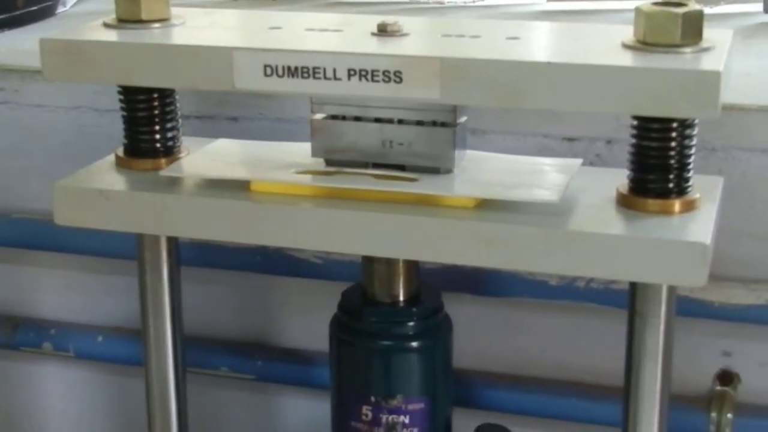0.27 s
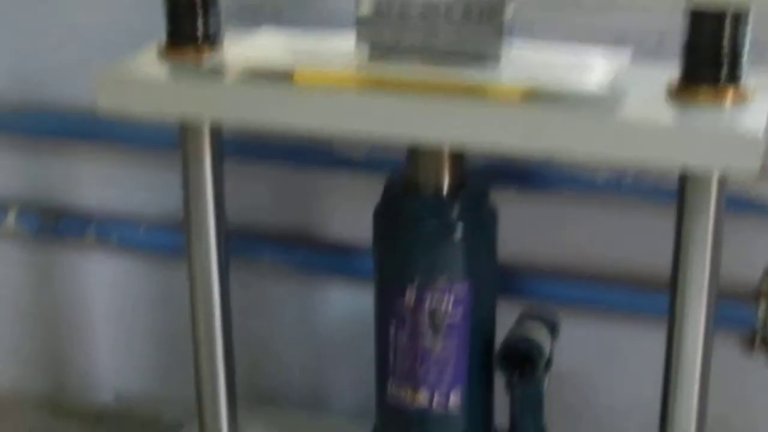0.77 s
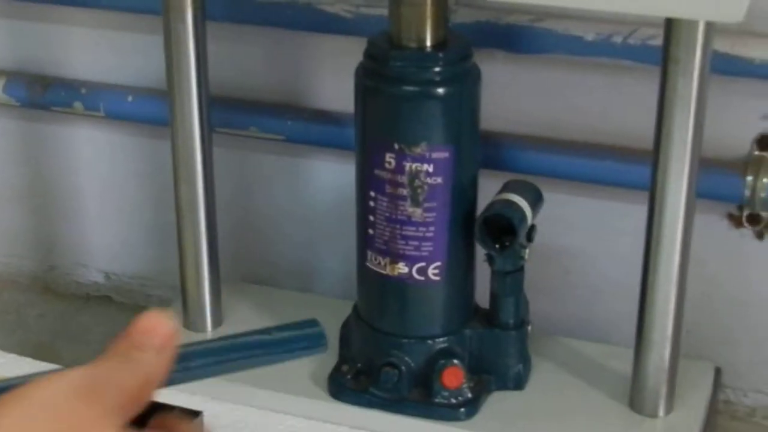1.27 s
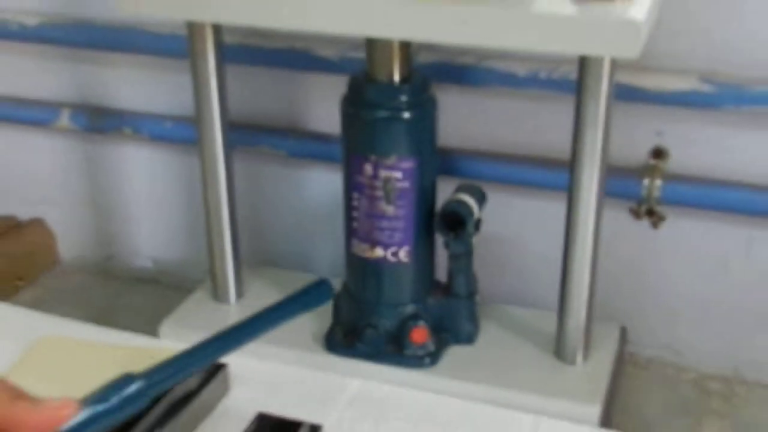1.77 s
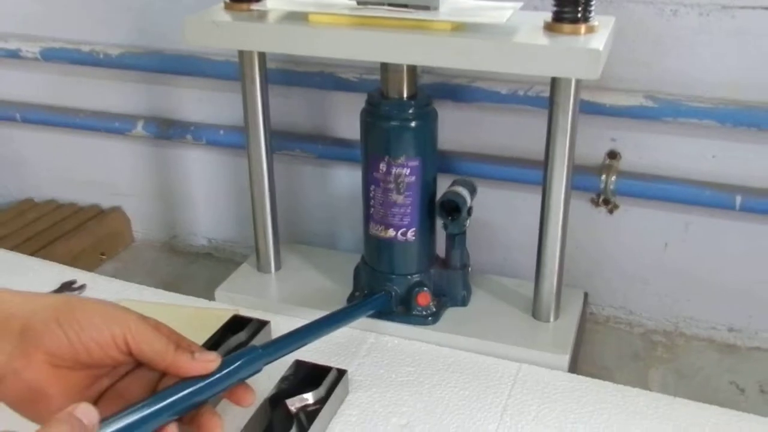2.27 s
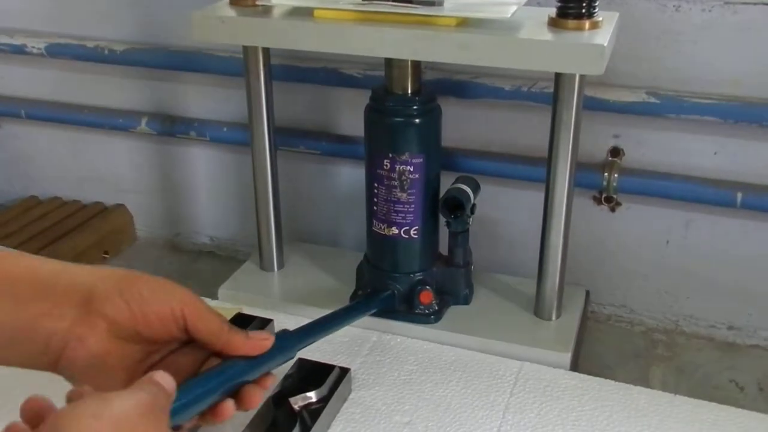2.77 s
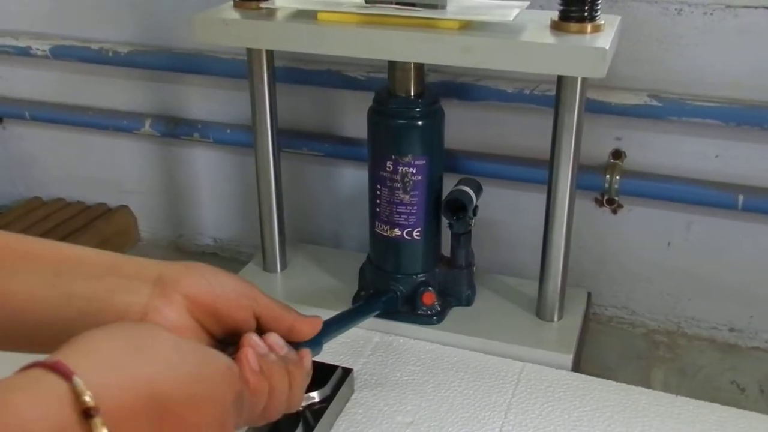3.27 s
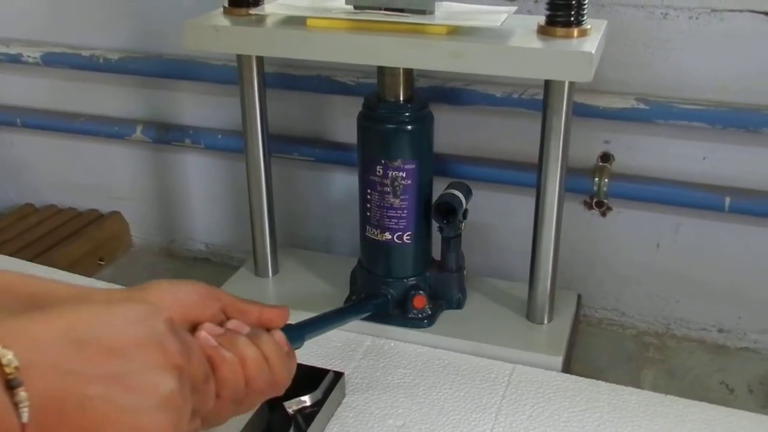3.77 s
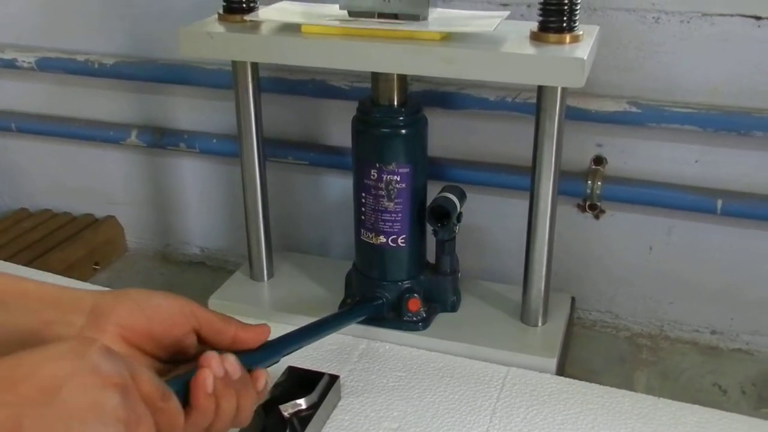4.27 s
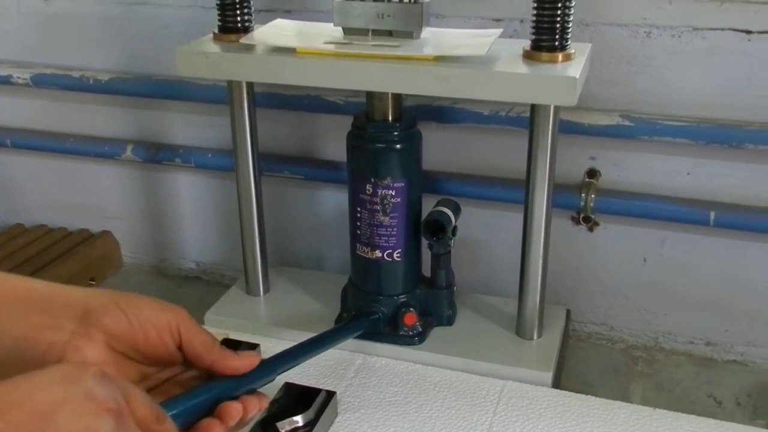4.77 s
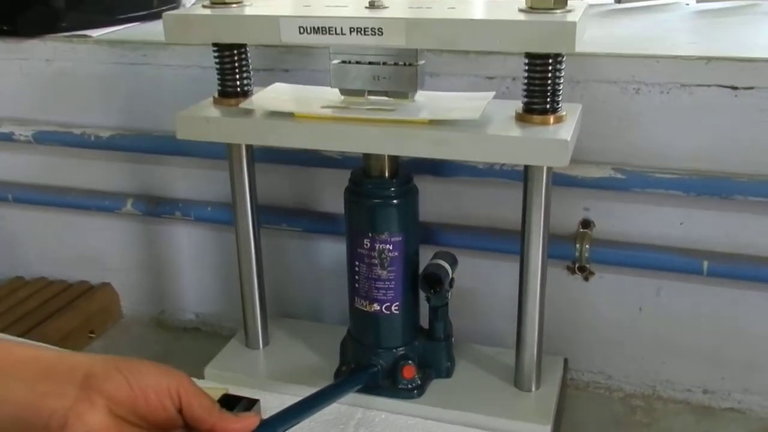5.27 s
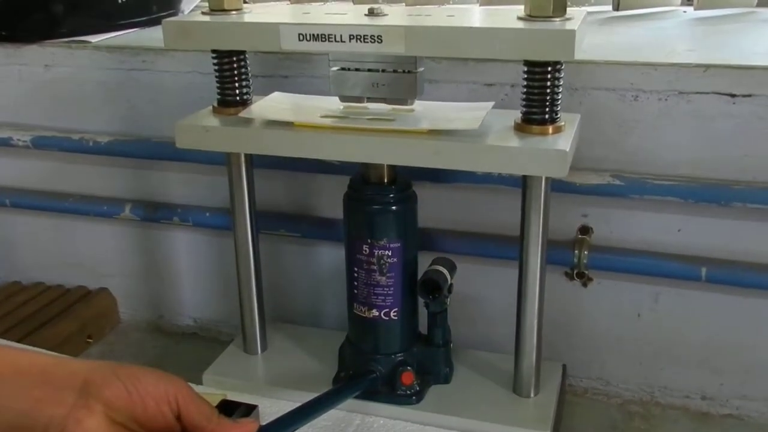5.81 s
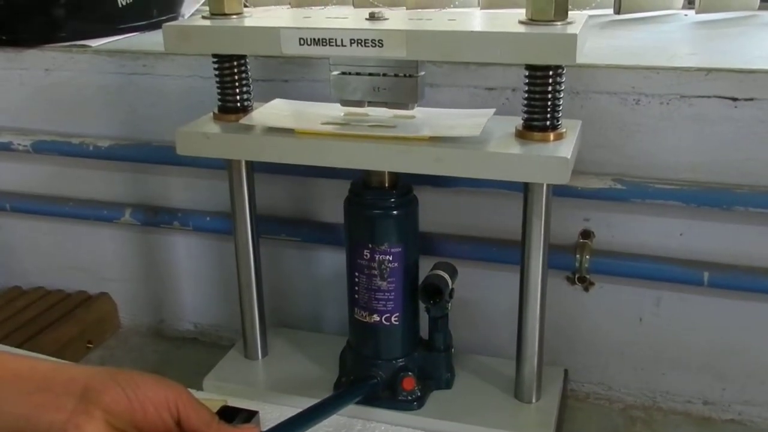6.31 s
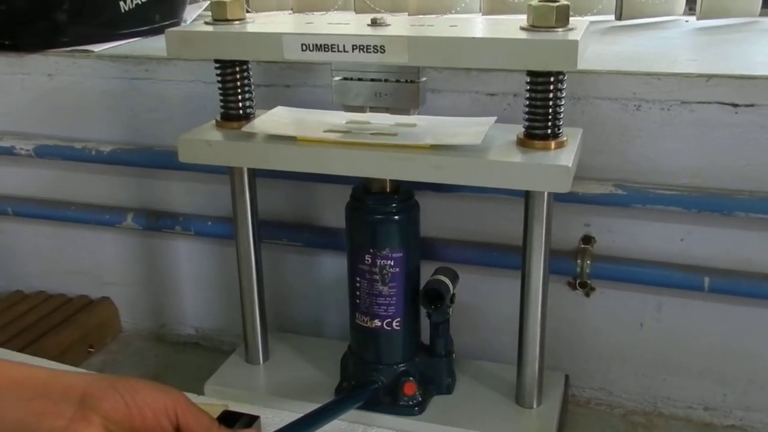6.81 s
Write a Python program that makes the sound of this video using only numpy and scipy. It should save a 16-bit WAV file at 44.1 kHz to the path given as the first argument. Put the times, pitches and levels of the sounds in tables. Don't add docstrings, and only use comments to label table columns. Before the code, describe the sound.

A fan's steady low drone and airy hiss, then ragged wind rumble and slaps buffet the microphone, with small steel ticks, easing near the end.

```python
import sys
import numpy as np
from scipy import signal
from scipy.fft import rfft, irfft, next_fast_len
from scipy.io import wavfile
from scipy.ndimage import uniform_filter1d

SR = 44100
rng = np.random.default_rng(int(sys.argv[2]) if len(sys.argv) > 2 else 0)


def materialize(psi):
    bounded = np.clip(np.atleast_2d(psi).T, -1, 1)
    quanta = np.round(bounded * 32767).astype(np.int16)
    wavfile.write(sys.argv[1], SR, quanta)


def ratio(d):
    e = np.asarray(d, float) / 20
    return 10 ** e


N = 310890
TIME = np.arange(N) / SR

# (frequency [Hz], level [dB per Hz])
TEARING_TONE = [(120, -12), (280, 5), (450, 5), (650, -1.5), (940, -10), (1350, -25), (2300, -37),
                (4000, -50)]


def evened(x):
    return x / np.sqrt(np.mean(x ** 2) + 1e-20)


def read(points, hz):
    f, value = np.transpose(points)
    return np.interp(np.log(hz + 1), np.log(f + 1), value)


def coloured(x, points):
    size = next_fast_len(x.shape[-1])
    curve_db = read(points, np.fft.rfftfreq(size, 1 / SR))
    return irfft(rfft(x, size) * ratio(curve_db), size)[..., :x.shape[-1]]


def drift(rate_hz, channels=1):
    b, a = signal.butter(1, np.clip(rate_hz, .1, 900), fs=SR)
    noise = rng.standard_normal((channels, N + SR))
    smooth = signal.lfilter(b, a, signal.lfilter(b, a, noise))
    return evened(smooth[:, SR:])


def fuzzy(hz, width_hz):
    a, b = drift(width_hz, channels=2)
    return a * np.cos(2 * np.pi * hz * TIME) + b * np.sin(2 * np.pi * hz * TIME)


def add(mix, start_s, sound):
    part = mix[:, round(start_s * SR):][:, :sound.shape[1]]
    part += sound[:, :part.shape[1]]


def gain_db():
    # (time [s], gain just after [dB])
    pulls = [(1.502, 1), (1.576, -1.5), (1.664, -9.5), (1.911, -11.5), (1.985, -18.5), (2.457, -15.5),
             (2.821, -12), (2.931, -14.5), (3.51, -12.5), (3.619, -14), (3.766, -16.5), (4.066, -17),
             (4.402, -17), (4.722, -18.5), (5.246, -15.5), (5.413, -19), (5.824, -17), (6.126, -17),
             (6.435, -16.5)]
    s, db = np.transpose([(0, 0)] + list(pulls))
    last = np.searchsorted(s, TIME, "right") - 1
    since = TIME - s[last]
    climb_db = 12 * since + 7 * since ** 2
    return uniform_filter1d(np.minimum(db[last] + climb_db, 0), 130)


def fan_air():
    # (frequency [Hz],
    # level [dB per Hz])
    air_tone = [(25, -24), (60, -24), (100, -9), (190, -12), (440, -9.5), (490, -13.5), (1010, -10),
                (1350, -19.5), (1850, -21.5), (2600, -28.5),
                (3300, -27), (5000, -33), (6500, -30), (7000, -32.5), (7600, -39), (11200, -40),
                   (12000, -45), (15800, -45)]
    # (frequency [Hz], likeness [-1 to 1])
    likeness = [(60, 0.97), (130, 0.96), (290, 0.95), (640, 0.98), (1410, 0.9), (3100, 0.6), (6820, 0.48),
                (15000, -0.23)]
    # (frequency [Hz], left over right [dB])
    balance = [(60, 8), (180, 2.5), (550, 2.5), (1650, -0.61), (4970, -2), (15000, 1)]
    frames, hz = N // 512 + 5, np.fft.rfftfreq(2048, 1 / SR)
    a, b, c, d, patches = rng.standard_normal((frames, 1025, 5)).T
    patches = evened(uniform_filter1d(uniform_filter1d(patches, 14, 0), 8, 1))
    same = np.clip(read(likeness, hz), -1, 1)[:, None]
    side = ratio(read(balance, hz)[:, None] / 2)
    left = a + 1j * b
    right = same * left + np.sqrt(1 - same ** 2) * (c + 1j * d)
    spectrum = np.array([left * side, right / side])
    spectrum *= ratio(read(air_tone, hz)[:, None] + 1.1 * patches)
    noise = signal.istft(spectrum, nperseg=2048, noverlap=1536)[1][:, :N]
    return ratio(-24.5 + .5 * drift(1.1)) * evened(noise)


def fan_tones():
    # (multiple of shaft speed, level [dB])
    hums = [(3, -35), (4, -43), (6, -30), (7, -41), (9, -43), (10, -38), (12, -36), (15, -45), (16, -44),
            (21, -46), (24, -42), (30, -46)]
    # (frequency [Hz], width [Hz], level
    # [dB])
    housing = [(101.2, 5.7, -37), (1016, 24, -37), (1850, 36, -45.5), (2090, 30, -53)]
    # (start [s], end [s], frequency [Hz], width [Hz], level [dB])
    whines = [
        (1.05, 3.6, 2795, 20, -47),
        (2.2, 6.0, 3245, 6, -57),
    ]
    shaft_hz = 37.43 * (1 + 0.00143 * drift(0.61)[0])
    turn = 2 * np.pi * np.cumsum(shaft_hz) / SR
    out = np.zeros(N)
    for k, db in hums:
        out += np.sqrt(2) * ratio(db + 2.4 * drift(5.6)[0]) * np.sin(k * turn + 6 * rng.random())
    for hz, width, db in housing:
        out += ratio(db) * fuzzy(hz, width)
    for start, end, hz, width, db in whines:
        fade = np.clip(np.minimum(TIME - start, end - TIME) / 0.26, 0, 1)
        out += ratio(db) * (.3 * fuzzy(hz, width) + np.sin(2 * np.pi * hz * TIME)) * fade
    return out * ratio(np.array([[.7], [-.7]]))


def handle():
    # (time [s], level [dB], frequency [Hz], time to fade by 60 dB [s])
    ticks = [
        (.105, -41, 11700, .05),
        (1.471, -20.5, 4470, 0.0087),
        (3.0152, -23, 6000, .004),
        (4.2063, -31, 6040, 0.0036),
        (5.4016, -33, 5000, .004),
    ]
    out, u = np.zeros((2, N)), np.arange(2600) / SR
    for s, db, hz, fade_s in ticks:
        noise = rng.standard_normal(2600)
        scrape = evened(coloured(noise, [(.5 * hz, -30), (0.86 * hz, 0), (1.2 * hz, 0), (2.5 * hz, -20)]))
        ring = np.sin(2 * np.pi * hz * u) + 0.73 * scrape * ratio(-60 * u / 0.013)
        add(out, s, ratio(db - 60 * u / fade_s) * ring * np.ones((2, 1)))
    return out


def cracks():
    # (time [s], level after the gain control [dB], left over right [dB])
    bursts = [(2.1939, -45, -1.0), (2.7317, -29, -5.0), (2.8094, -41, -1.0), (3.0131, -20.5, -11),
              (3.3334, -28, -4.0), (3.6094, -34, 1), (3.8706, -30, 9.0), (3.8966, -28, 2),
              (4.0532, -38, -3.0), (4.078, -26, -1.0), (4.2535, -29, 3.0), (4.3287, -29, 0.0),
              (4.7112, -27, 3.0), (4.9614, -37, 1), (5.0449, -27, 4.0), (5.814, -31, -6), (6.117, -31, -1),
              (6.4273, -20.5, 13)]
    out, u, gain = np.zeros((2, N)), np.arange(-220, 220) / SR, gain_db()
    tick = np.exp(-(u / 0.00061) ** 2) * np.sin(2 * np.pi * 1060 * u)
    for s, db, pan_db in bursts:
        ports_db = db + 3.5 + np.array([[pan_db], [-pan_db]]) / 2
        add(out, s - .003, tick * ratio(ports_db - gain[round(s * SR)]))
    return out


def eddies(pops, points, steady_s):
    x = coloured(pops, points)
    span = max(round(steady_s * SR), 8)
    power = uniform_filter1d(uniform_filter1d(x ** 2, span), span)
    return evened(x / np.sqrt(abs(power) + 1e-12))


def slaps():
    # (time [s], near port [dB], far port [dB], slow push [dB]), after the gain control
    left_bursts = [(1.562, -10, -40, 16), (1.617, -11, -10, 9), (1.821, -6, -22, -9), (2.197, -12, -8, 2),
                   (2.287, -12, -9, -5), (2.424, 4.5, -5, 7), (2.447, -6, -29, -3), (2.593, 0.5, -5.5, -3),
                   (2.811, -2.5, -5.5, 5), (2.925, 3.5, -16, 1), (3.014, -5, -10, 0), (3.505, 1.5, -4, 3.5),
                   (3.612, 1, -4, 0), (3.67, -7.5, -9.5, 13), (3.758, -8, -6, 0), (3.899, -2, -20, 7),
                   (4.084, -5, -8.5, 6.5), (4.208, -0.5, -16, -13), (4.329, -4, -26, -2),
                   (4.397, -5, -0.5, 5.5), (4.55, 0.5, -8, 6.5), (4.741, -3, -19, 3), (5.187, -2, -22, 0),
                   (5.241, 2, -19, 3), (5.4, 3, -18, 7.5), (5.742, -4, -12, 4), (5.816, -7, -10, 12),
                   (5.92, 0, -7, -5), (6.116, -1, -18, 6), (6.429, -2.5, -8.5, 4)]
    # (time [s], near port [dB], far port [dB], slow push [dB]), after the gain control
    right_bursts = [(1.667, -7.5, -11, 3), (1.904, -0.5, -9, 8.5), (1.958, -6, -40, 11.5),
                    (1.98, -3.5, -26, 0), (2.306, -4, -15, 9), (2.472, -2, -10, 0), (2.562, -7, -10, 8),
                    (2.666, -9, -10, -11), (2.736, -4, -13, -2), (2.764, -2.5, -3, 3),
                    (2.857, -2.5, -28, -5), (3.165, -4.5, -28, -12), (3.235, -13, -13, 11),
                    (3.334, -1, -25, 4), (3.87, -8.5, -8, 5), (3.974, -5, -6, -1), (4.054, -2, -17, 11),
                    (4.643, -0.5, -6, -11), (4.908, -6, -4, -8), (4.964, -4, -11, -12),
                    (5.049, -6.5, -1.5, 7.5), (5.142, -15, -12, 5), (5.313, -13, -2.5, 5),
                    (5.337, -11, -10, 1), (5.772, -15, -12, 16), (5.851, -12.5, -12, -4),
                    (6.074, -5.5, -9, -0.5), (6.305, -10, -11, -17), (6.5, -16, -14.5, 16),
                    (6.868, -5.5, -7, 8)]
    out, u, gain = np.zeros((2, N)), np.arange(-1764, 2205) / SR, gain_db()
    rows = list(left_bursts) + [(s, far_db, near_db, push_db) for s, near_db, far_db, push_db in right_bursts]
    pops = rng.standard_normal((2, N)) * ratio(4.2 * drift(150, channels=2))
    rags = eddies(pops, TEARING_TONE, 0.017)
    for s, left_db, right_db, push_db in rows:
        luck = rng.random(5)
        v = 378 * (1 + .14 * (2 * luck[4] - 1)) * u
        phase = 2 * np.pi * luck[2] + 2.45 * np.array([[0], [luck[3]]])
        swing = np.exp(-(v / np.where(v < 0, .45, 1.1)) ** 2) * np.cos(2 * np.pi * 0.74 * v + phase)
        snap = 0.26 * np.exp(-(v / 0.2) ** 2) * np.cos(2 * np.pi * 1.77 * v + phase)
        push_hz = 160 * (0.5 + 0.65 * luck[0])
        push = np.exp(-((u - .002) / 0.0048) ** 2) * np.cos(2 * np.pi * (push_hz * u + luck[1]))
        scuff = np.exp(-((u - .003) / 0.015) ** 2) * evened(rags[:, round(s * SR):][:, :len(u)])
        burst = swing + snap + ratio(push_db - 5.0) * push + ratio(-14.5) * scuff
        ports = ratio(np.array([[left_db], [right_db]]) - 2.0)
        add(out, s + u[0], burst * ports / ratio(gain[round(s * SR)]))
    return coloured(out, [(20, -26), (100, -0.5), (1100, 1.5), (1800, 13), (2800, -40)])


def draught():
    # (frequency [Hz], level [dB per Hz])
    rumble_tone = [(22, -27), (40, -16), (60, -9), (80, 2.5), (160, 0), (260, -6.5), (400, -20), (700, -62),
                   (1200, -87)]
    # (time [s], buffeting [dB], left over right [dB], tearing edge over rumble [dB])
    strength = [(1.53, -44, 9, -12), (1.561, -13.5, 11, -13), (1.671, -2, 1, -25), (1.82, -3, -2, -16),
                (1.92, 0.5, 2.5, -14), (2.1, -0.5, 2.5, -8.5), (3.0, 1.5, 1, -9), (3.3, -3, 4, -11.5),
                (3.52, 1, 6.5, -14), (4.7, 2, 2, -10), (5.9, 5.5, 0, -12.5), (6.2, -5, 2, -21.5),
                (6.3, 5, -2, -6.5), (6.507, -3, 5, -22), (6.55, -26, -7, -34), (6.8, -20, 0, -35),
                (6.825, -6, 7, -23), (6.913, -7, 6, -23)]
    # (centre [s], half-width [s], level change [dB], left
    # over right [dB])
    lulls = [(1.74, 0.032, -7.5, -3), (2.26, 0.03, -1, 0), (2.391, 0.01, -4, -4), (2.628, 0.018, -9, 3),
             (2.79, 0.049, -7, 4), (3.084, 0.028, -13, 4), (3.2, 0.043, -7, 5), (3.315, 0.011, -9, 5),
             (3.463, 0.039, -16.5, -6), (3.65, 0.051, -4, 0), (3.74, 0.012, -7.5, -2),
             (3.825, 0.016, -3.5, -4), (3.947, .022, -13, 2), (4.03, 0.039, -4.5, -1),
             (4.183, 0.012, -10, 0), (4.285, 0.015, -12.5, 3), (4.374, 0.023, -6.5, -3),
             (4.9, 0.028, -9, -1), (5.003, 0.02, -7, -2), (5.092, 0.022, -5.5, -3), (5.16, 0.035, -5, -5.5),
             (5.36, .02, -5.5, 1), (5.511, 0.01, -7.5, -10), (5.64, 0.073, -4, -2), (5.784, 0.017, -10, 9),
             (5.876, 0.013, -23, -9), (6.013, 0.033, -9.5, 1), (6.265, 0.021, -23, 1),
             (6.362, 0.029, -8.5, 6), (6.47, 0.021, 5.5, -7)]
    s, *columns = np.transpose(strength)
    level_db, pan_db, edge_db = (np.interp(TIME, s, c) for c in columns)
    level_db = level_db + np.maximum(-900 * np.maximum(TIME - s[-1], 0), -24)
    for centre, half, depth_db, lean_db in lulls:
        dip = np.exp(-((TIME - centre) / half) ** 2)
        level_db = level_db + depth_db * dip
        pan_db = pan_db + lean_db * dip
        edge_db = edge_db + depth_db * dip
    pops = rng.standard_normal((2, N)) * ratio(5.7 * drift(95, channels=2))
    ports = eddies(pops, rumble_tone, 0.042)
    ports += ratio(edge_db + 3.0) * eddies(pops, TEARING_TONE, 0.042)
    ports *= ratio(level_db - 2.5 + np.array([pan_db, -pan_db]) / 2) * (TIME > s[0])
    ports += slaps()
    other = coloured(ports[::-1], [(30, -10.0), (120, 0.5), (8000, -4)])
    return ports - 0.34 * other


def scene():
    # (time [s], share turned [0 to 1])
    turning = [
        (0, 0),
        (1.5, 0.03),
        (3.0, 0),
        (6.3, 0.4),
        (7.05, 1.0),
    ]
    facing = np.interp(TIME, *np.transpose(turning))
    fan = fan_air() * ratio(2.3 * facing) + fan_tones() * ratio(-3.5 * facing)
    return fan + handle() + cracks() + draught()


def band_limit(x):
    return signal.sosfilt(signal.butter(12, 15910, fs=SR, output="sos"), x)


def record(dry):
    x = 1.041 * dry * ratio(gain_db())
    x = np.clip(x / (1 + (x / 1.12) ** 4) ** (1 / 4), -1, 1)
    x = coloured(x, [(20, 0), (15800, 0), (16000, -40)])
    return band_limit(x)


dry = scene()
out = record(dry)
materialize(out)
```